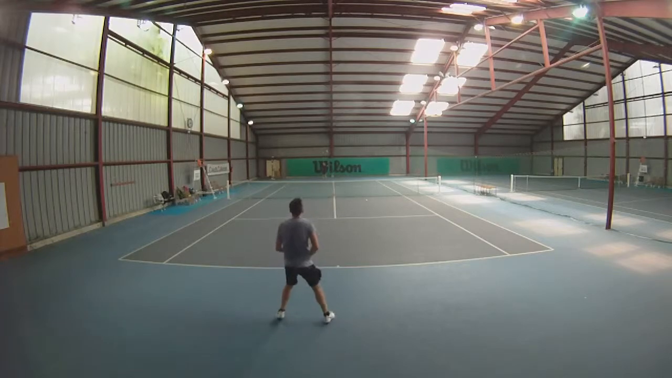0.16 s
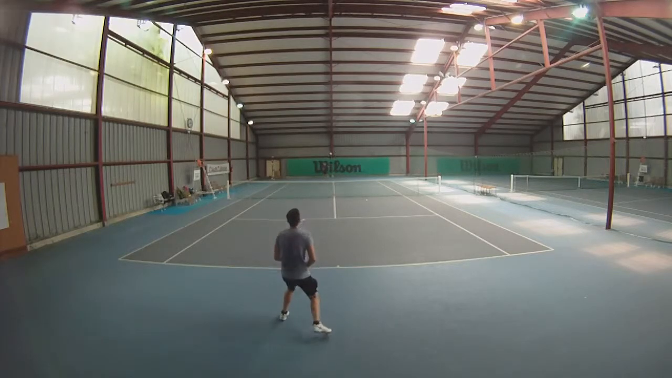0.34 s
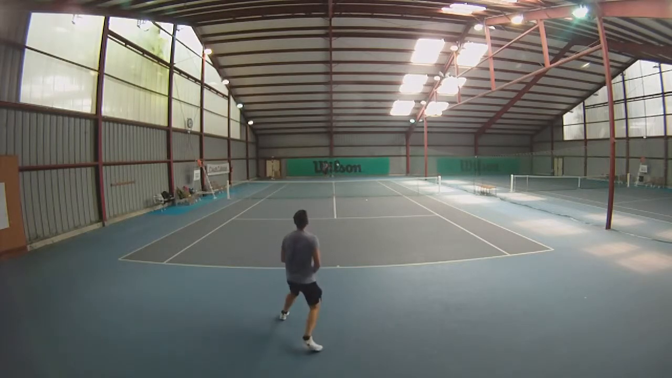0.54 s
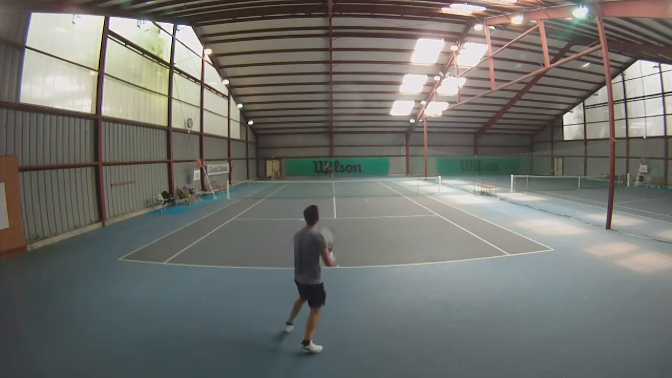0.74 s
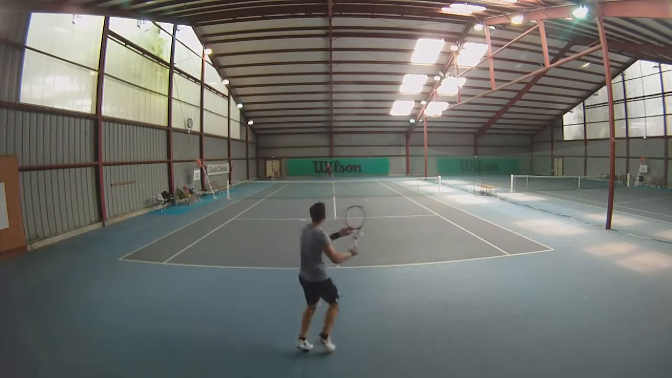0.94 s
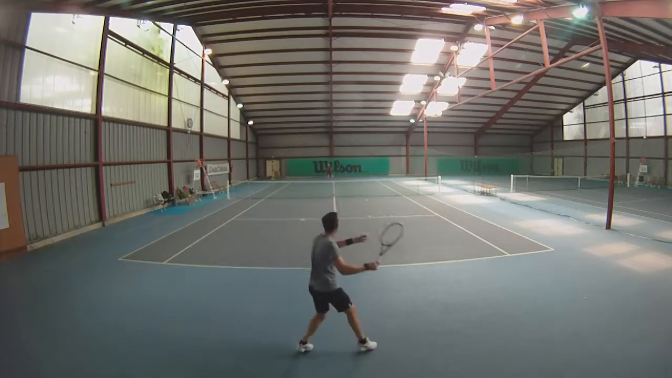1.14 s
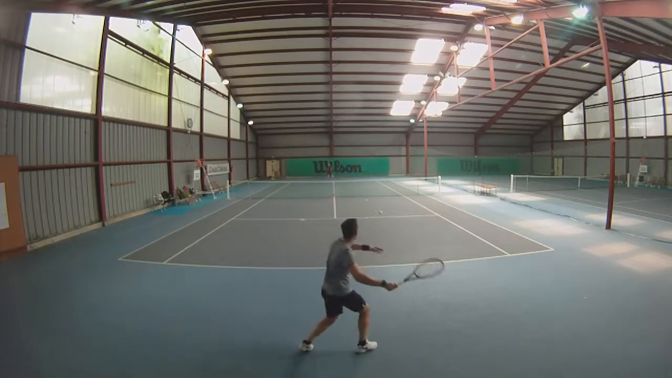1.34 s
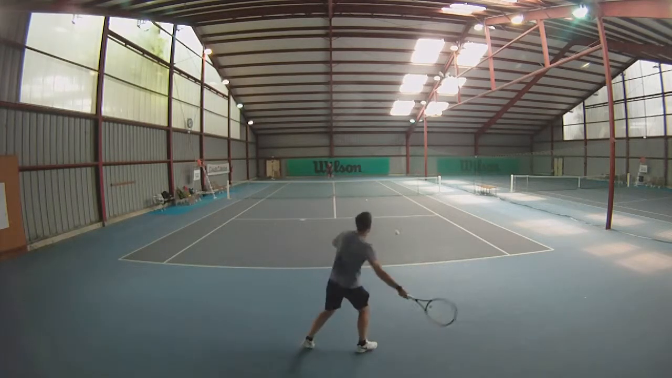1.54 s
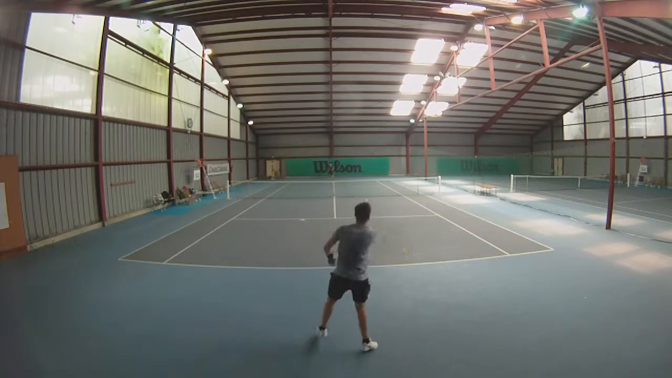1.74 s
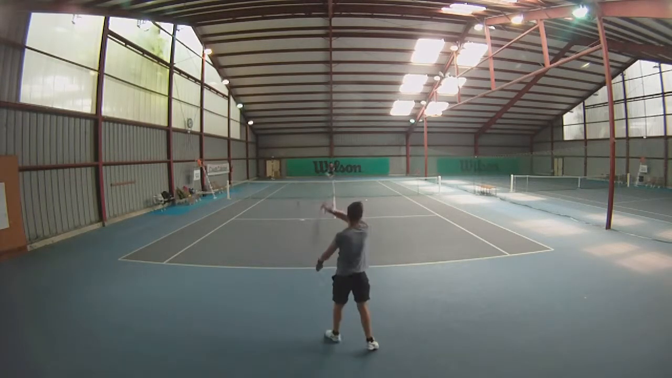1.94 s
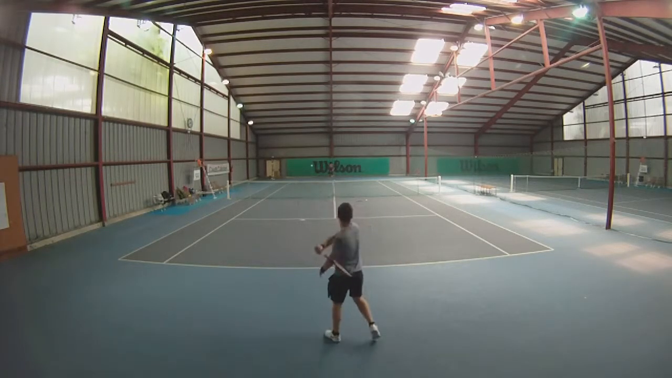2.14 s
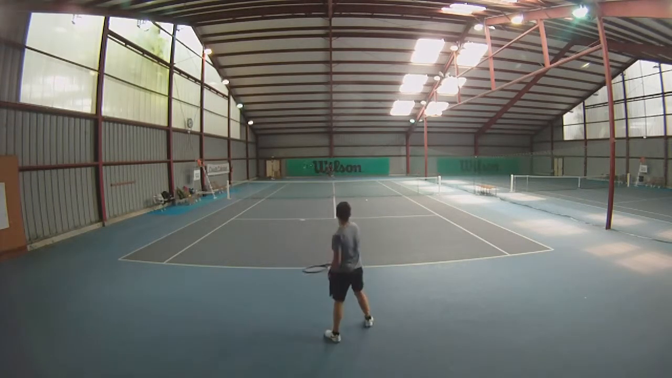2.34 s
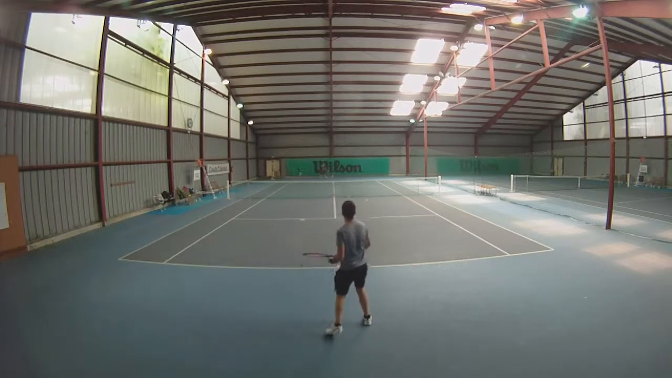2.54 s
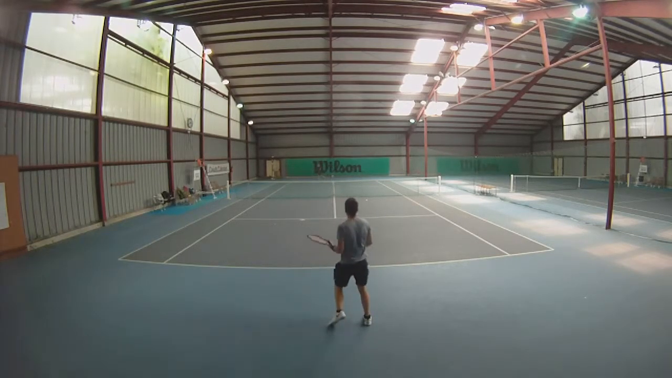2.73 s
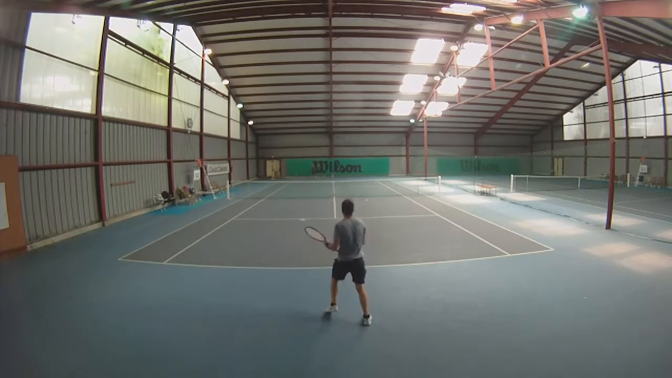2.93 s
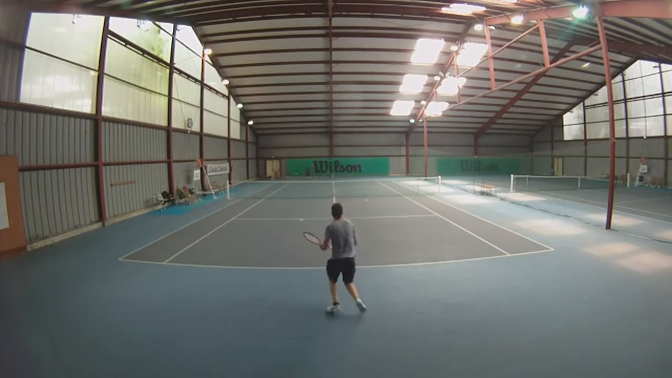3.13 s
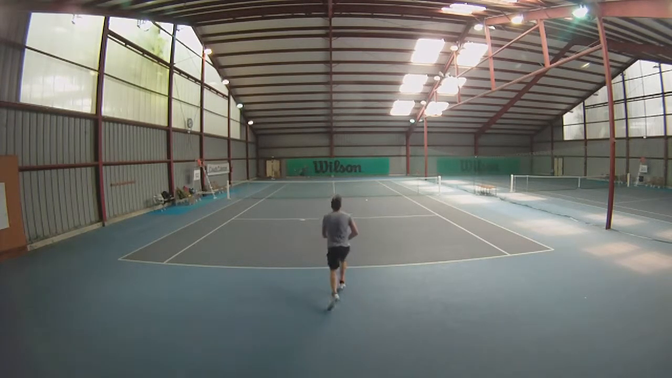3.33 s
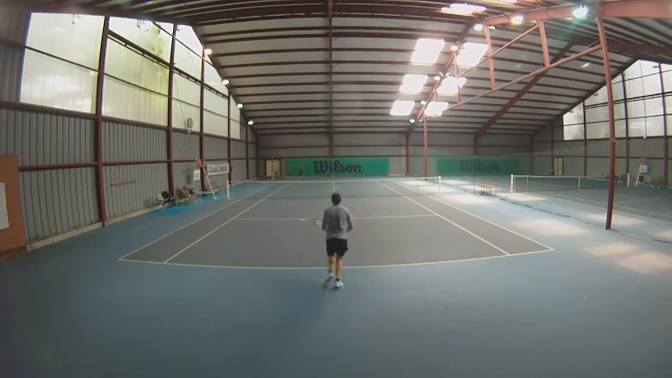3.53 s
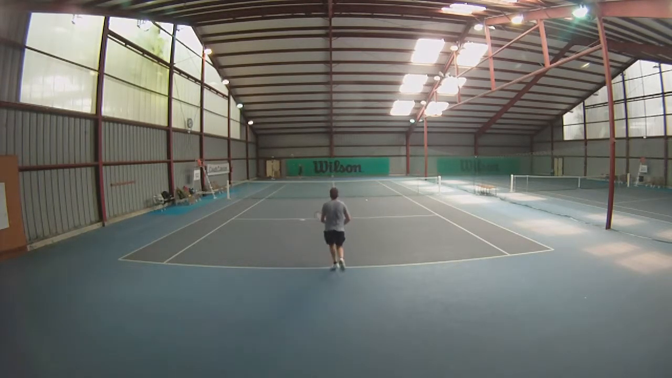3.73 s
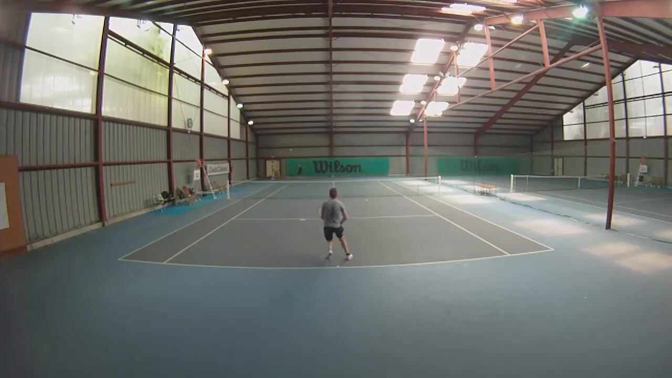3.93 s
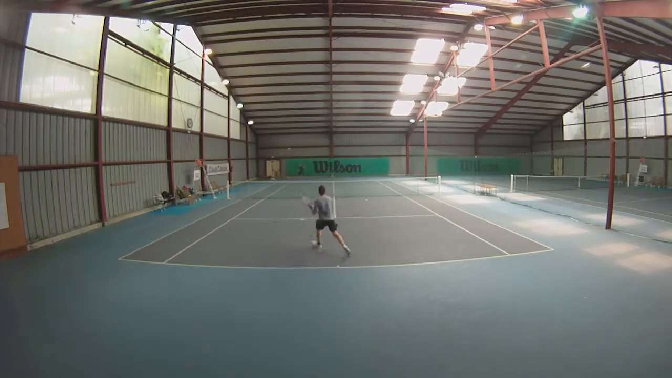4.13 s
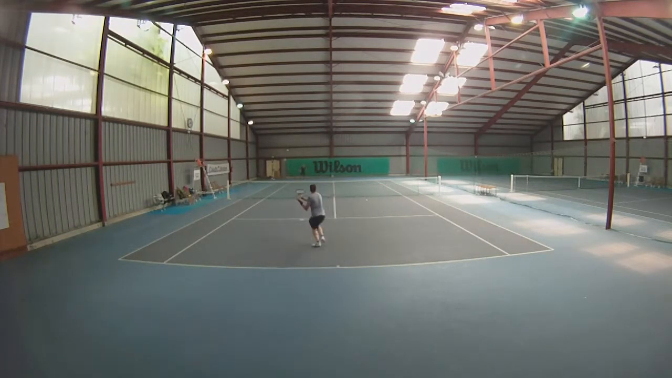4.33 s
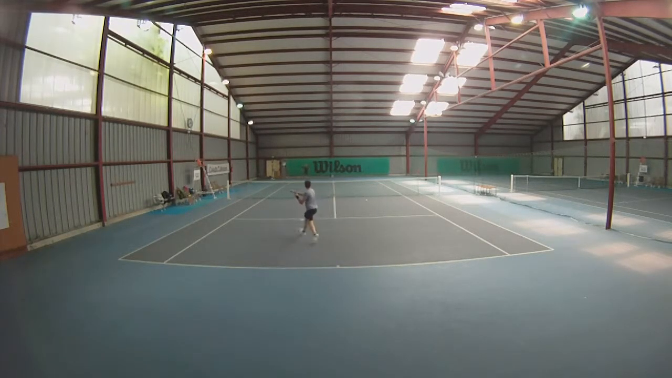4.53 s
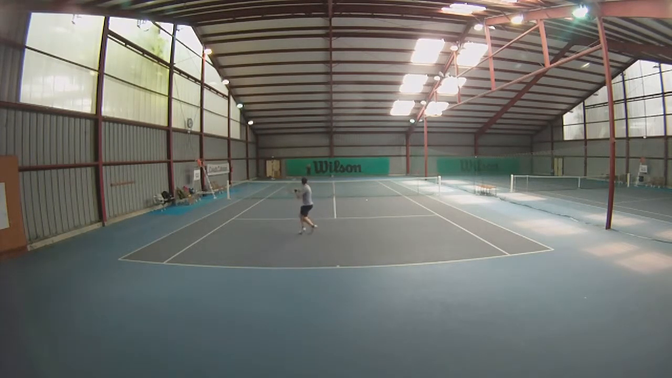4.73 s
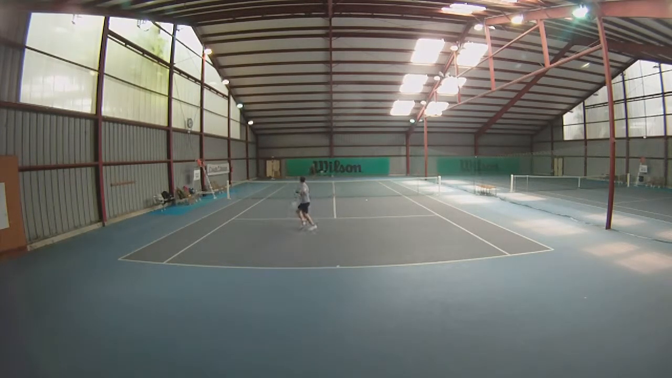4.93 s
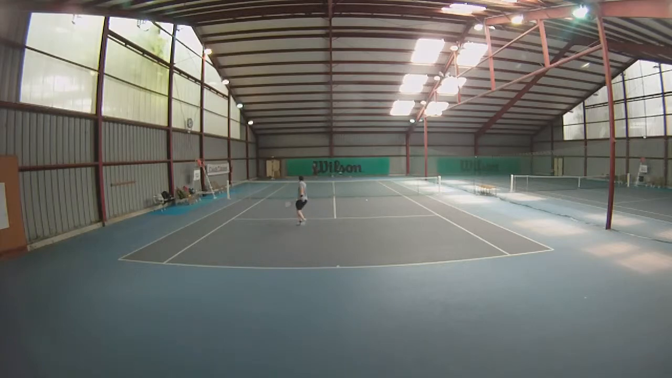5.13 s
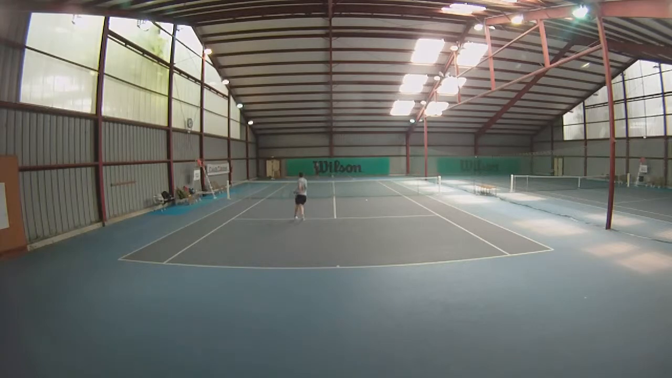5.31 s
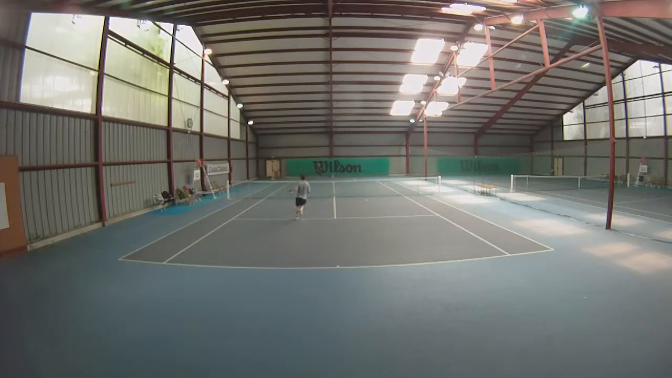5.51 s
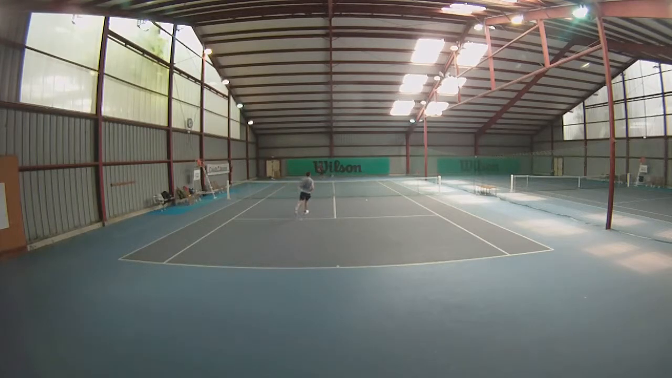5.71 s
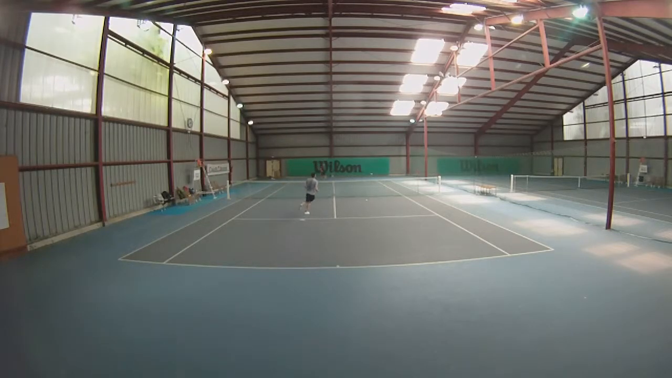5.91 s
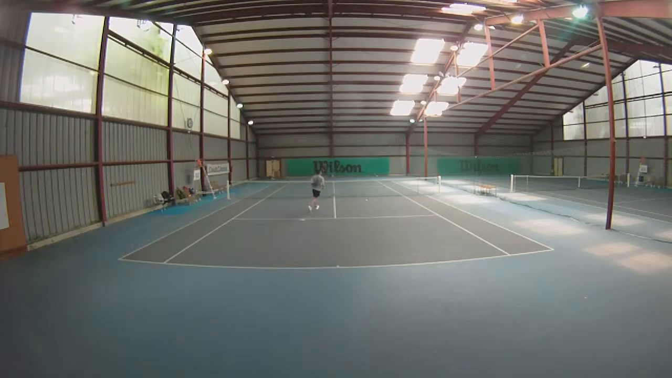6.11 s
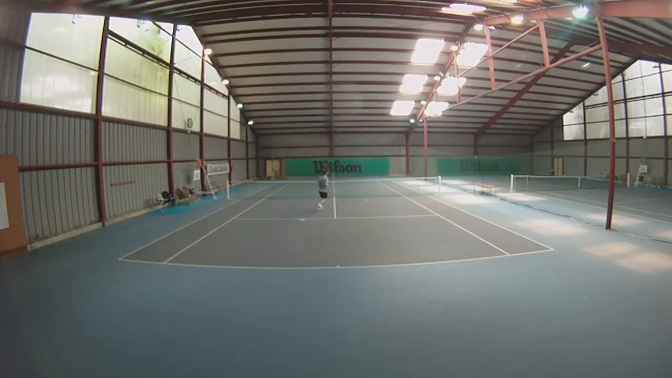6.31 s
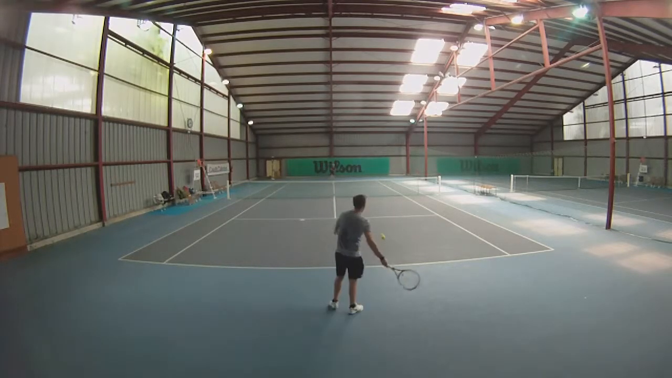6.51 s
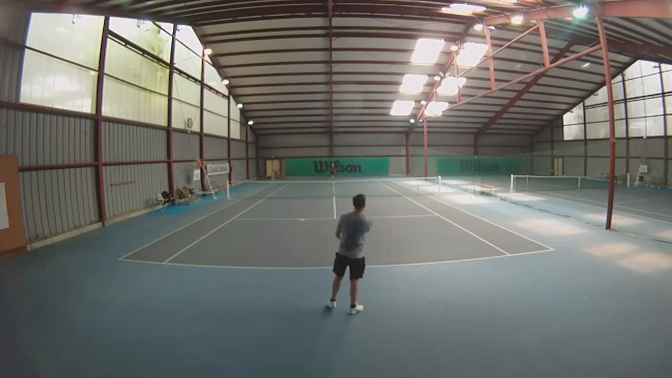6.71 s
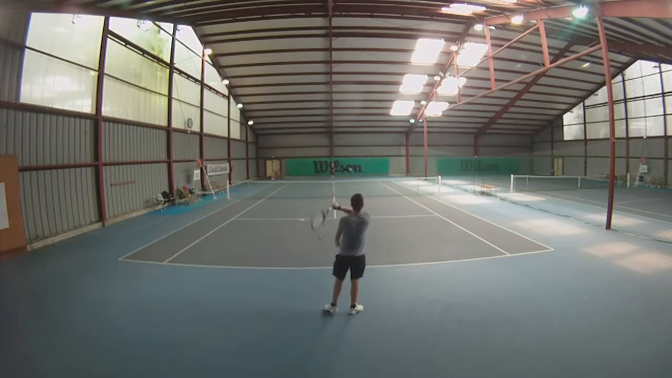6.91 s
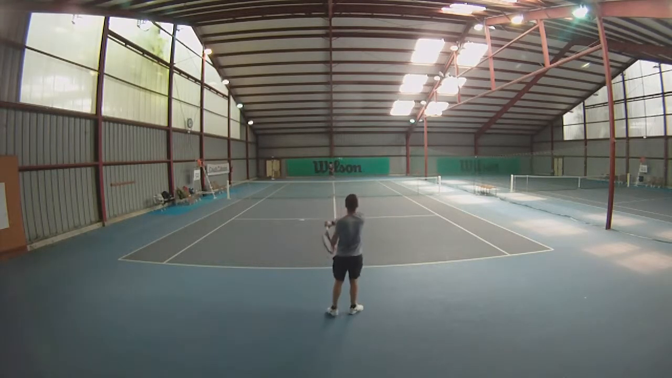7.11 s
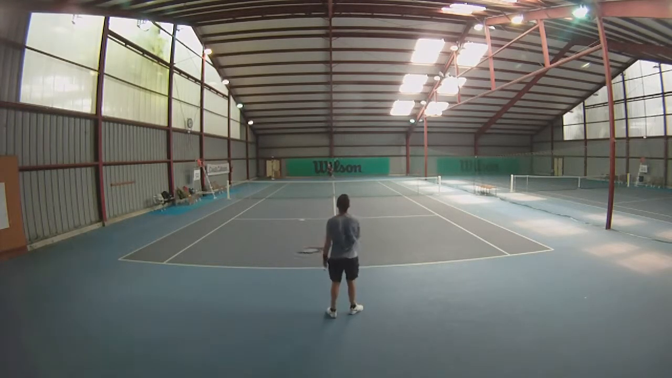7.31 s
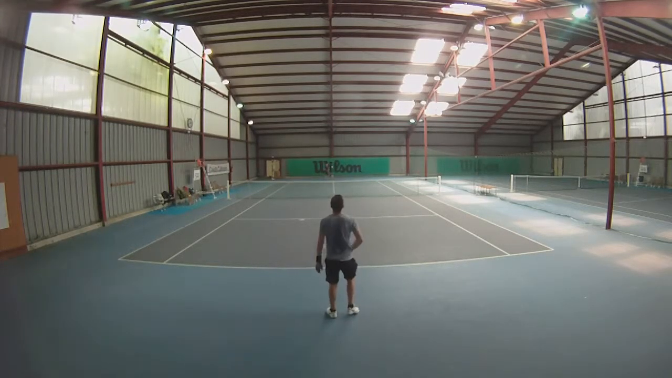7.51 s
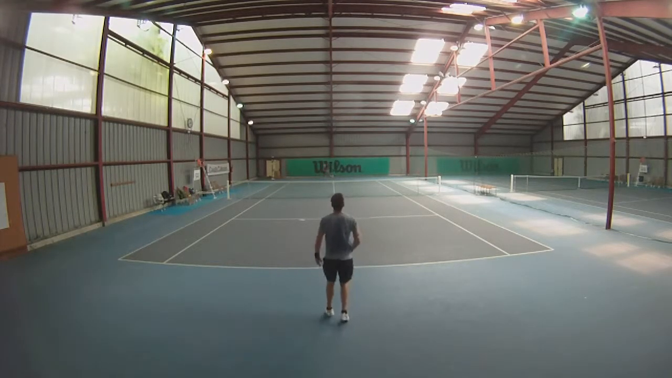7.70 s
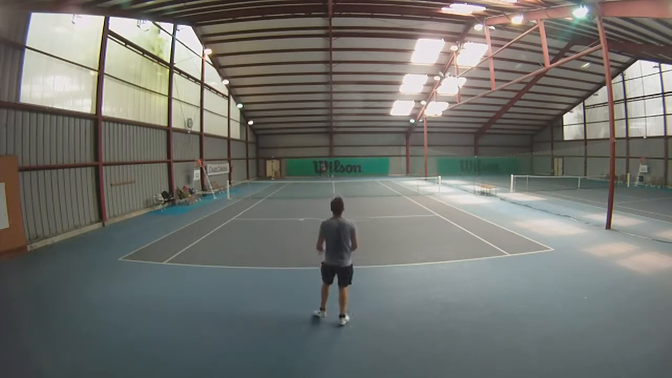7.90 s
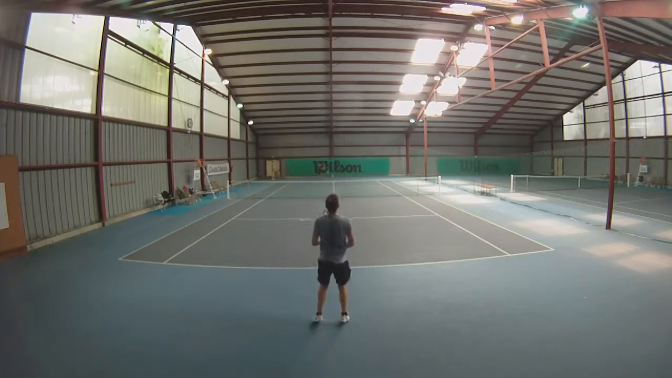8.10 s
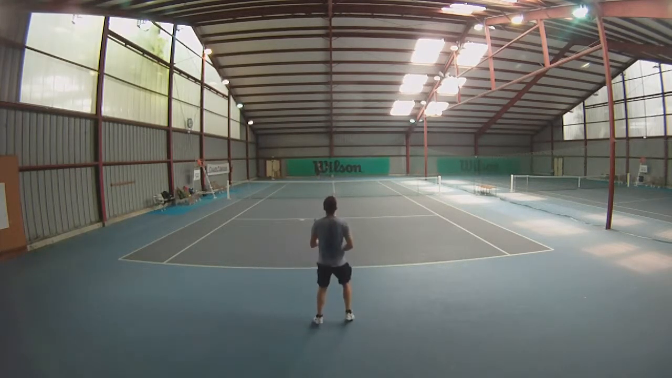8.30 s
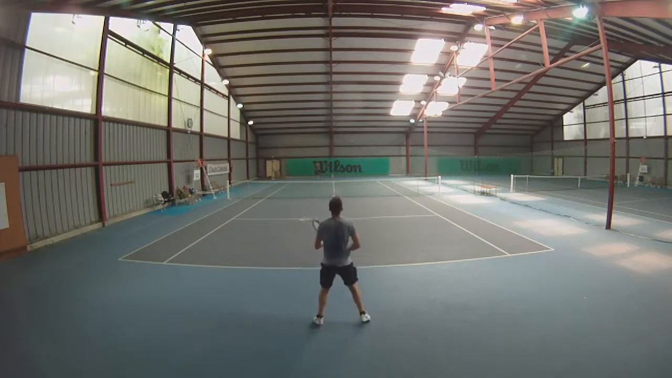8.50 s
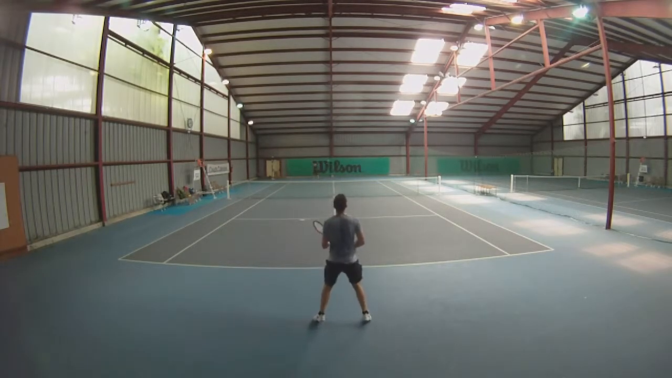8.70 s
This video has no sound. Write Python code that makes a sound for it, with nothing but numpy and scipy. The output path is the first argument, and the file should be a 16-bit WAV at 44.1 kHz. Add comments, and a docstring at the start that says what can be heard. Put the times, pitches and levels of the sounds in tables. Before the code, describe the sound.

In a big metal-roofed tennis hall, a stroke is already ringing as it begins. Shoes scuff and squeak, then hollow racket pops come near and far, each trailing seconds of reverberation and far-wall booms. Faint ball bounces and dull knocks at the microphone fall between. Midway a hard splice cuts the ringing; a weak pinging mishit follows, then quiet footwork and a last distant stroke. A low drone and thin air noise persist.

```python
"""Tennis in a large steel hall: faint air noise and a low drone run throughout.
First an earlier stroke and squeak ring on, then shoes scuff and squeak, the camera knocks and balls bounce,
with racket strokes in between. Each hit and step is a short dry sound with a long noise tail from the roof.
The far wall throws strokes back, near ones most strongly. At 6.47 s a splice to another rally ends all ringing.
A small camera picks everything up, holding each sample at a low rate, which mirrors sound into the treble."""
import sys
import numpy as np
from scipy import signal
from scipy.fft import rfft, irfft, next_fast_len
from scipy.io import wavfile
from scipy.ndimage import uniform_filter1d

SR = 44100
rng = np.random.default_rng(int(sys.argv[2]) if len(sys.argv) > 2 else 0)


def output_pcm(signal):
    """Save a mono or channel-first signal as 16-bit PCM at the path in sys.argv[1].

    Samples are clipped to [-1, 1] before scaling.
    """
    pcm = np.clip(np.atleast_2d(signal).T, -1, 1) * 32767
    wavfile.write(sys.argv[1], SR, np.round(pcm).astype(np.int16))


N = 385875

# Quiet air of the hall. Each row: frequency in Hz, relative level in dB per Hz.
AIR = [(20, -15.5), (35, -24.5), (55, -12.5), (90, -10), (130, -12.5), (200, -16.5), (320, -20), (500, -19),
       (900, -31.5), (1500, -31), (2800, -36), (4000, -37), (5800, -44.5)]
# Low drone. Each row: frequency in Hz, relative level in dB per Hz.
DRONE = [(20, -17), (36, -15.5), (46, -8), (58, 2.5), (67, -10), (80, -14.5), (130, -30), (400, -100)]
# Racket strokes. Each row: start in seconds, strength in dB, distance in metres, brightness in dB,
# how far off the sweet spot from 0 to 1.
STROKES = [(-0.25, -4, 12, -1.5, 0), (1.8137, -2.5, 5.05, 1, 0), (3.544, -5.5, 18.8, -2.5, 0.24),
           (4.8216, -3, 7.85, -1.5, 0), (6.7793, -16, 5.25, 5.5, 0.96), (8.637, -3, 27, -3, 0.1)]
# Ball and racket ringing together, before tuning and brightness.
# Each row: frequency in Hz, level in dB, time to fall by 60 dB in seconds.
RACKET = [(162, -28.5, 0.16), (383, -5, 0.037), (471.8, 1, 0.029), (496, -10.5, 0.026), (972, -1, 0.018),
          (1410, -34, 0.0043), (1622, -10, 0.0081), (2182, -10.5, 0.0029), (2370, -13.5, 0.0079),
          (3013, -16, 0.006)]
# Felt cracking on a surface. Each row: frequency in Hz, relative level in dB.
CRACK = [(120, -2), (750, -11), (1350, 5), (2900, 3), (3600, -14.5), (5000, -12), (6000, -30.5)]
# Echoes from the far wall. Each row: delay in seconds, level in dB.
FAR_WALL = [(0.041, -8), (0.187, -3.5), (0.194, -1.5), (0.246, -4), (.41, -15.5), (0.437, -9)]
# Shoe squeaks. Each row: start in seconds, strength in dB, distance in metres, length in seconds,
# start pitch in Hz, end pitch in Hz, roughness (1 is rough).
SQUEAKS = [(-0.05, -51, 8, 0.02, 4600, 4880, 1.2), (0.338, -49, 3.2, 0.027, 2675, 3010, 1.04),
           (3.954, -28, 5.1, 0.067, 2313, 3584, 0.85), (5.133, -42, 9.4, 0.027, 4320, 4316, 0.88),
           (5.135, -35, 6.8, 0.0097, 3260, 3460, 0.77), (7.736, -53.5, 11, 0.12, 3450, 3645, 0.4)]
# Rubbing noise of a squeak. Each row: frequency in Hz, relative level in dB.
RUB = [(300, -6.5), (1300, -19.5), (1800, 1.5), (2400, 3), (3400, -3.5), (4000, -7), (4800, -7),
       (6000, -17.5)]
# Shoe scuffs. Each row: start in seconds, strength in dB, distance in metres, fade length in seconds,
# heel thud in dB relative to the drag.
SCUFFS = [(0.338, -52.5, 3.2, 0.018, -1), (1.243, -41.5, 7.3, 0.023, 2), (2.476, -42, 7.8, 0.024, -16.5),
          (2.920, -46, 6.7, 0.038, -20), (3.158, -46.5, 11.2, 0.068, 14), (3.428, -36.5, 13, 0.053, 14),
          (3.982, -41, 6, 0.013, 13.5), (5.699, -36, 9.4, 0.0084, -25)]
# Sole dragging on grit. Each row: frequency in Hz, relative level in dB.
SOLE = [(100, -18), (350, 5), (700, -7), (1500, -7.5), (2900, -4), (3700, -30), (6000, -22.5)]
# Dry knocks right at the microphone. Each row: start in seconds, level in dB.
KNOCKS = [(0.615, -19), (1.003, -27.5), (4.689, -21), (4.715, -24.5), (6.327, -34.5), (8.156, -25),
          (8.576, -32)]
# Ringing of the camera's case, before a small random change of level.
# Each row: frequency in Hz, level in dB, time to fall by 60 dB in seconds.
CASE = [(374, 10, 0.018), (495, 6.5, 0.022), (616, -14, 0.023), (2450, -19.5, 0.039)]
# Ball bounces. Each row: start in seconds, strength in dB, distance in metres.
BOUNCES = [(1.058, -29, 4.36), (2.974, -31, 11), (5.77, -35, 17), (7.998, -27, 20)]
# The ball ringing alone, before brightness.
# Each row: frequency in Hz, level in dB, time to fall by 60 dB in seconds.
SHELL = [(167, -8.5, 0.028), (284, 3, 0.028), (1100, 0.5, 0.012), (1720, -3.5, 0.0091), (2666, 0.5, 0.006)]
# How long the hall rings. Each row: frequency in Hz, time to fall by 60 dB in seconds.
HALL_T60 = [(100, 1.7), (300, 3.4), (550, 2.07), (1000, 2.7), (2500, 3.64), (3600, 3.38), (5500, 2.33)]
# Tone of the hall. Each row: frequency in Hz, gain in dB.
HALL_COLOUR = [(60, -6), (160, 5), (310, 3.5), (500, -5.5), (720, -3.5), (950, -3), (1300, -2.5), (2000, 0),
               (2800, 0.5), (3600, 5.5), (6000, 1)]
# Faint side noise, opposite in left and right. Each row: frequency in Hz, gain in dB.
SIDE_NOISE = [(60, -36.5), (130, -38), (300, -51.5), (1000, -31), (2200, -33.5), (3500, -27.5), (5500, -14),
              (9000, -23.5), (14000, -23)]

AIR_DB, DRONE_DB = -55, -52
PING_HZ, PING_T60 = 2430, 0.11  # strings; T60 is the time in seconds to fall by 60 dB
FRAME_HZ, FRAME_T60 = 322, 0.06
HEEL_HZ, HEEL_T60 = 454, 0.017
# a clean stroke, and what a full miss of the sweet spot adds to it
FRAME_DB, MISS_FRAME_DB = -19.5, 15
PING_DB, MISS_PING_DB = -30.5, 20.5
MISS_FLATTENS = 0.046  # taken off the pitch factor by a full miss
# as a sole grips, its rubbing noise fades and its pitch steadies
RUB_DB, GRIP_RUB_DB = 2, -13
WAVER_START, WAVER_END = 0.13, 0.018  # share of the pitch, at roughness 1
# direct sound and hall are equally loud at the critical distance; the direct sound falls with each doubling
CRITICAL_M, FALL_DB = 8.15, 8
CUT_S = 6.47  # splice between two rallies
HOLD_HZ, TOP_HZ = 12000, 15500  # sample-and-hold rate, band limit


def amp(db):
    """Decibels to gain."""
    return 10 ** (np.asarray(db) / 20)


def unit(x):
    """Scale a sound to an rms (average strength) of 1."""
    return x / np.sqrt(np.mean(x ** 2) + 1e-20)


def clock(seconds):
    """Sample times from zero."""
    return np.arange(int(seconds * SR)) / SR


def along(points, hz):
    """Read a value between (Hz, value) points on a log frequency axis."""
    point_hz, values = np.transpose(points)
    return np.interp(np.log(hz + 1), np.log(point_hz), values)


def filtered(x, response):
    """Multiply each frequency of a sound by the response there."""
    size = x.shape[-1]
    padded = next_fast_len(size + SR // 10)
    spectrum = rfft(x, padded) * response(np.fft.rfftfreq(padded, 1 / SR))
    return irfft(spectrum, padded)[..., :size]


def noise(spectrum, size):
    """Coloured noise of rms 1, with nothing above half the hold rate."""
    white = rng.standard_normal(size)
    return unit(filtered(white, lambda hz: amp(along(spectrum, hz)) * (hz < HOLD_HZ / 2)))


def ring(t, hz, t60):
    """One ringing tone that dies away, falling 60 dB in t60 seconds."""
    return np.sin(2 * np.pi * hz * t) * np.exp(-np.log(1000) * t / t60)


def add(track, s, sound):
    """Mix a sound in at time s; the splice between two rallies ends whatever still rings."""
    start = round(s * SR)
    end = round(CUT_S * SR) if s < CUT_S else N
    part = sound[max(-start, 0):max(end - start, 0)]
    track[max(start, 0):][:len(part)] += part


def doublings(metres):
    """Distance in doublings of the critical distance, below zero when nearer."""
    return np.log2(max(metres, 1) / CRITICAL_M)


def direct_db(metres):
    """Level of the direct sound over that of the hall."""
    return -FALL_DB * doublings(metres)


def blurred_spectrum(sound, hz, blur, least_hz=25):
    """Strength of a sound's spectrum, averaged over a share `blur` of each frequency to either side."""
    energy = np.cumsum(np.abs(rfft(sound, SR)) ** 2)
    reach = blur * hz + least_hz
    below, above = np.interp([hz - reach, hz + reach], np.arange(len(energy)), energy)
    return np.sqrt(np.abs(above - below) / (2 * reach))


def hall(sound, hall_db, blur, build_s=0.0033, flutter_db=1.5):
    """The sound and its diffuse tail, which builds up, arrives in clumps and dies at each frequency's own speed."""
    t = clock(2.6)
    hz, when, grid = signal.stft(rng.standard_normal(len(t)), SR, nperseg=512)
    fade = np.exp(-np.log(1000) * when / along(HALL_T60, hz)[:, None])
    # smoothed over time and then over frequency
    flutter = uniform_filter1d(rng.standard_normal(grid.shape), size=4, axis=1)
    flutter = uniform_filter1d(flutter, size=12, axis=0)
    clumps = amp(flutter_db * unit(flutter))
    tail = signal.istft(grid * fade * clumps, SR)[1][:len(t)]
    tail = tail / np.linalg.norm(tail)
    # the hall hears the source from every side, which evens out the fine notches of its spectrum
    tail = filtered(tail, lambda f: blurred_spectrum(sound, f, blur) * amp(along(HALL_COLOUR, f)))
    # it fills as fast as the source gives off its energy
    direct = np.pad(sound, (0, len(t) - len(sound)))
    given_off = np.sqrt(np.cumsum(direct ** 2) / np.sum(direct ** 2))
    filled = given_off * (1 - np.exp(-t / build_s))
    return direct + amp(hall_db) * filled * tail


def heard_from(sound, metres, blur):
    """Distance weakens the direct sound, while the hall answers equally from everywhere."""
    return hall(amp(direct_db(metres)) * sound, -direct_db(metres), blur)


def smeared(sound, spread_s):
    """Blur a sound in time with a short burst of noise that swells and fades."""
    t = clock(0.2)
    cluster = rng.standard_normal(len(t)) * t * np.exp(-t / spread_s)
    return signal.fftconvolve(sound, cluster / np.linalg.norm(cluster))


def near_walls(hit):
    """A cluster of reflections from floor, side wall and beams."""
    return smeared(hit, spread_s=0.019)


def far_wall(hit, low_hz=220, high_hz=520):
    """The ribbed cladding scatters the treble, so its distinct echoes are hollow booms."""
    band = signal.butter(2, [low_hz, high_hz], "bandpass", fs=SR, output="sos")
    boom = signal.sosfilt(band, hit)
    echoes = np.zeros(SR)
    for delay, db in FAR_WALL:
        echoes[round(delay * SR):][:len(boom)] += amp(db) * boom
    return echoes


def impact(t, modes, bright_db, crack_db, crack_t60, pitch=1, sustain=1, edge_hz=750):
    """Ringing tones pop and the felt cracks; harder contact brings out everything above the low thump."""
    pop = sum(amp(level + bright_db * (hz > edge_hz)) * ring(t, hz * pitch, t60 * sustain)
              for hz, level, t60 in modes)
    crack = noise(CRACK, len(t)) * np.exp(-np.log(1000) * t / crack_t60)
    return pop + amp(crack_db + bright_db) * crack


def background():
    """Faint air noise and a low drone fill the hall."""
    return amp(AIR_DB) * noise(AIR, N) + amp(DRONE_DB) * noise(DRONE, N)


def strokes(dwell_s=0.0021, tuning=0.97, sustain=0.94, smear=1.114, near_db=-11, near_grows_db=3,
            far_db=-15, far_falls_db=3.5, ping_hall_db=-5):
    """The ball sinks into the strings, which ping as it leaves. Off the sweet spot the frame thumps, the ping
    is louder and the pop is flatter; from far away the walls smear the stroke."""
    out, t = np.zeros(N), clock(0.15)
    contact = 1 - np.exp(-(t / dwell_s) ** 2)
    for s, db, metres, bright_db, miss in STROKES:
        away, direct = doublings(metres), amp(direct_db(metres))
        pop = impact(t, RACKET, bright_db, crack_db=-11.5, crack_t60=0.037,
                     pitch=tuning - MISS_FLATTENS * miss, sustain=sustain * smear ** away)
        thump = amp(FRAME_DB + MISS_FRAME_DB * miss) * ring(t, FRAME_HZ, FRAME_T60)
        hit = amp(db) * contact * (pop + thump)
        ping = amp(db + PING_DB + MISS_PING_DB * miss) * contact * ring(t, PING_HZ, PING_T60)
        add(out, s, heard_from(hit + amp(ping_hall_db) * ping, metres, blur=0.035))
        # the strings beam along the court, so only part of their ping fills the hall
        add(out, s, direct * (1 - amp(ping_hall_db)) * ping)
        add(out, s, amp(near_db + near_grows_db * away) * near_walls(hit))
        add(out, s, direct * amp(far_db - far_falls_db * away) * far_wall(hit))
    return out


def squeaks(glide_power=2.4):
    """Rubber sticks and slips at a gliding rate: rough rubbing at first, a cleaner tone once the sole grips."""
    out = np.zeros(N)
    for s, db, metres, length, start_hz, end_hz, rough in SQUEAKS:
        grip = clock(length) / length  # from 0 to 1
        waver = uniform_filter1d(rng.standard_normal(len(grip)), size=50)
        depth = rough * WAVER_START * (WAVER_END / WAVER_START) ** grip
        glide = end_hz + (start_hz - end_hz) * (1 - grip) ** glide_power
        pitch = glide * (1 + depth * unit(waver - waver.mean()))
        tone = np.sqrt(2) * np.sin(2 * np.pi * np.cumsum(pitch) / SR)
        rubbing = amp(RUB_DB + GRIP_RUB_DB * grip) * noise(RUB, len(grip))
        swell = np.sqrt(np.abs(np.sin(np.pi * grip)))
        add(out, s, heard_from(amp(db) * swell * (tone + rubbing), metres, blur=0.0036))
    return out


def scuffs(rise_s=0.00037):
    """A heel lands and the sole drags briefly over the gritty court."""
    out, t = np.zeros(N), clock(0.15)
    for s, db, metres, length, heel_db in SCUFFS:
        drag = (1 - np.exp(-t / rise_s)) * np.exp(-(t / length) ** 2) * noise(SOLE, len(t))
        heel = amp(heel_db) * ring(t, HEEL_HZ, HEEL_T60)
        add(out, s, heard_from(amp(db) * (drag + heel), metres, blur=0.12))
    return out


def knocks(soft_s=0.0028):
    """Small dull knocks in the camera's case, too weak to wake the hall."""
    out, t = np.zeros(N), clock(0.1)
    contact = 1 - np.exp(-(t / soft_s) ** 2)
    for s, db in KNOCKS:
        # each tone's level varies a little from knock to knock
        case = sum(amp(level + rng.normal()) * ring(t, hz, t60) for hz, level, t60 in CASE)
        add(out, s, amp(db) * contact * case)
    return out


def bounces(soft_s=0.00084, bright_db=4, brightening_db=1.5, near_db=-1.5, near_falls_db=3):
    """The hollow ball thuds on the court; from the far end it is thinner and mostly hall."""
    out, t = np.zeros(N), clock(0.15)
    contact = 1 - np.exp(-t / soft_s)
    for s, db, metres in BOUNCES:
        away = doublings(metres)
        thud = impact(t, SHELL, bright_db + brightening_db * away, crack_db=-10, crack_t60=0.017)
        hit = amp(db) * thud * contact
        add(out, s, heard_from(hit, metres, blur=0.16))
        add(out, s, amp(near_db - near_falls_db * away) * near_walls(hit))
    return out


def scene():
    """Ball, shoes, knocks and hall reach both channels alike."""
    mid = background() + strokes() + squeaks() + scuffs() + knocks() + bounces()
    return np.array([mid, mid])


def add_side_noise(pair):
    """Faint side noise: a weak smeared copy, opposite in left and right, mostly treble."""
    copy = smeared(pair[0], spread_s=0.0024)[:N]
    side = filtered(copy, lambda hz: amp(along(SIDE_NOISE, hz)))
    return pair + np.array([side, -side])


def record(dry):
    """Sample-and-hold at a low rate mirrors the sound into the treble, up to the band limit."""
    narrow = filtered(dry, lambda hz: 1 / np.sqrt(1 + (hz / 5800) ** 40))  # steep low-pass
    rounded = narrow / (1 + np.abs(narrow) ** 8) ** (1 / 8)  # rounds off the loudest peaks
    mirrored = rounded * (1 + 2 * np.cos(2 * np.pi * HOLD_HZ * np.arange(N) / SR))
    # holding each sample dulls the treble
    return filtered(add_side_noise(mirrored), lambda hz: np.sinc(hz / HOLD_HZ) * (hz < TOP_HZ))


dry = scene()
out = record(dry)
output_pcm(out)
```